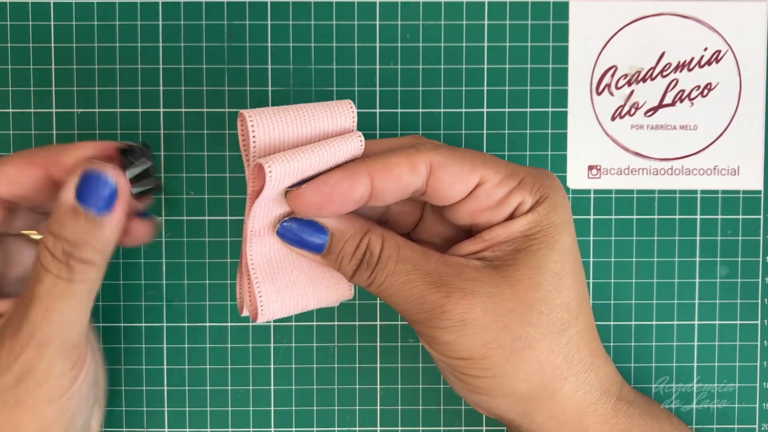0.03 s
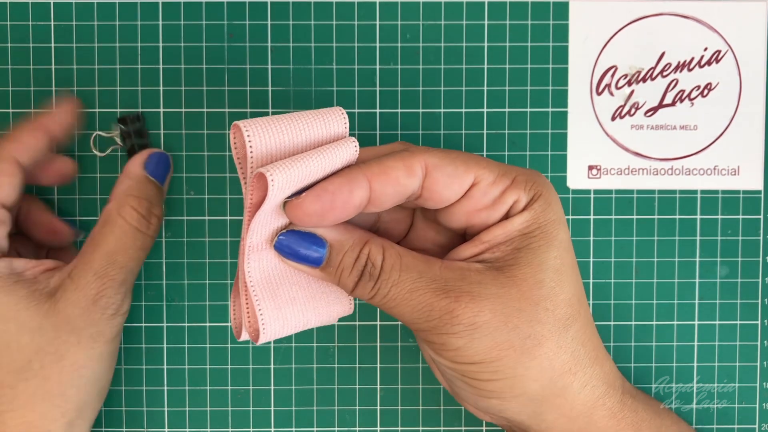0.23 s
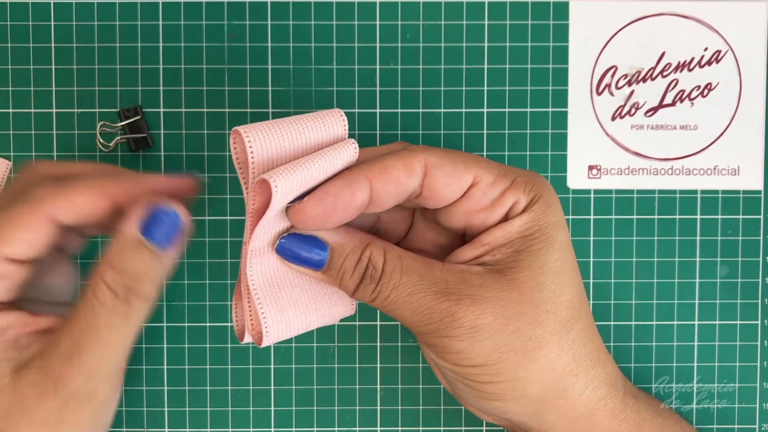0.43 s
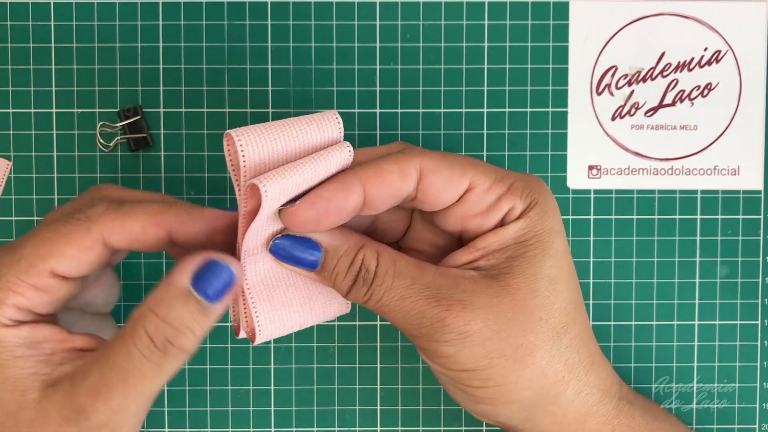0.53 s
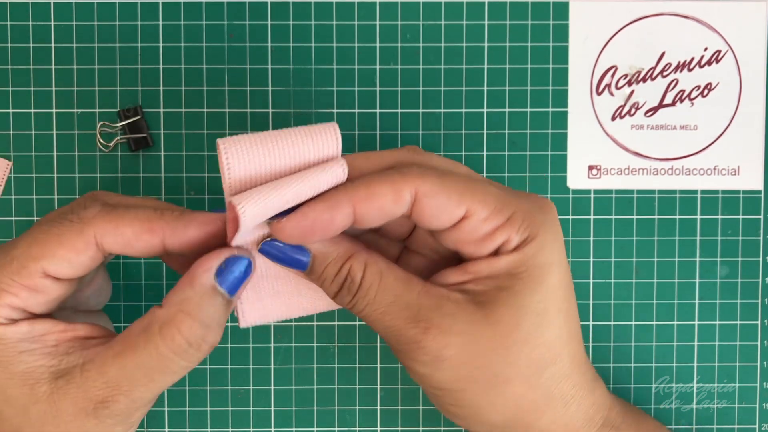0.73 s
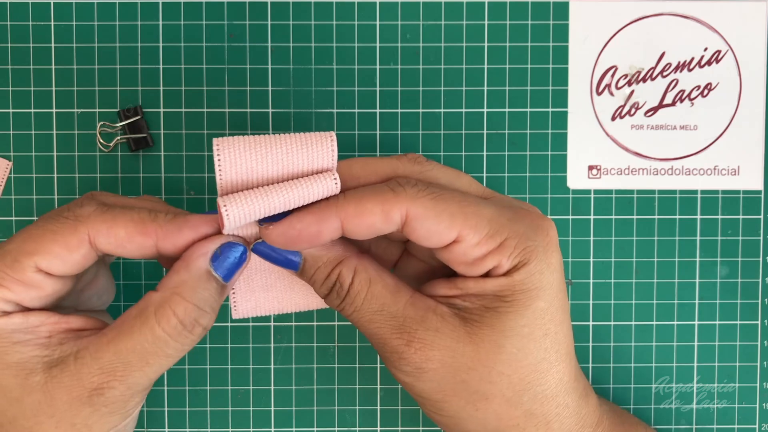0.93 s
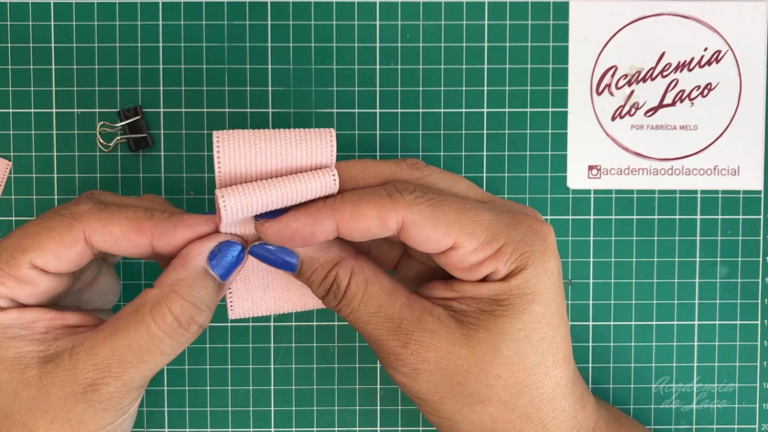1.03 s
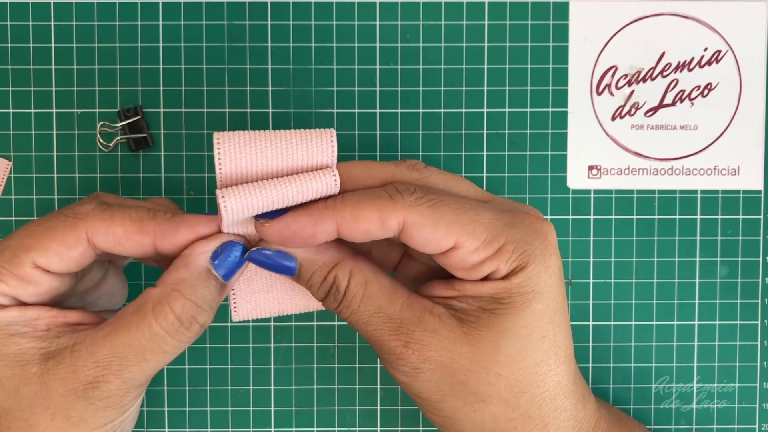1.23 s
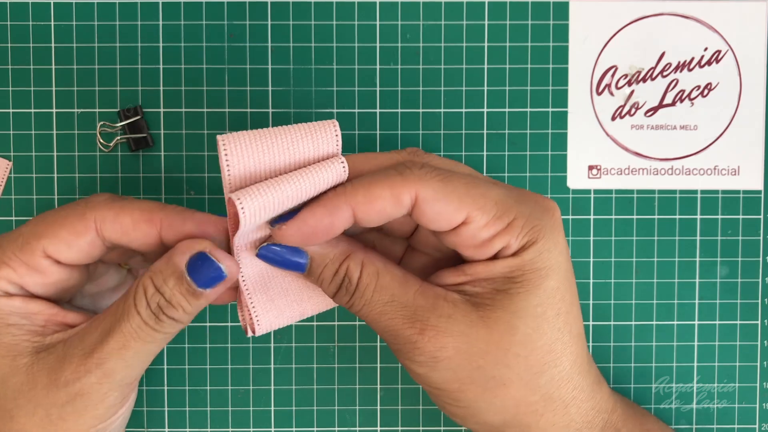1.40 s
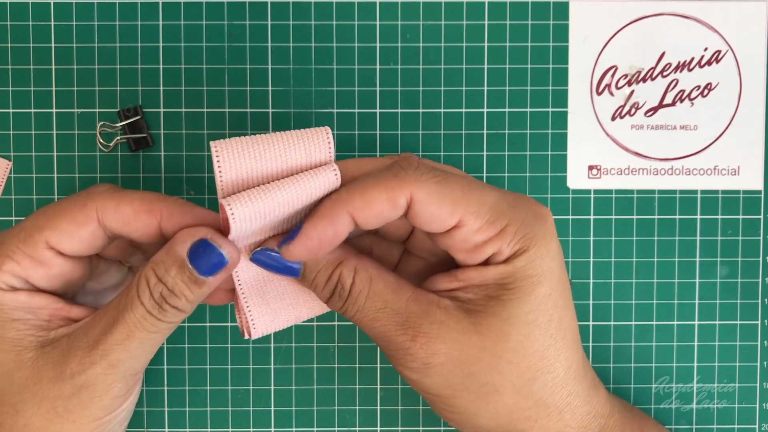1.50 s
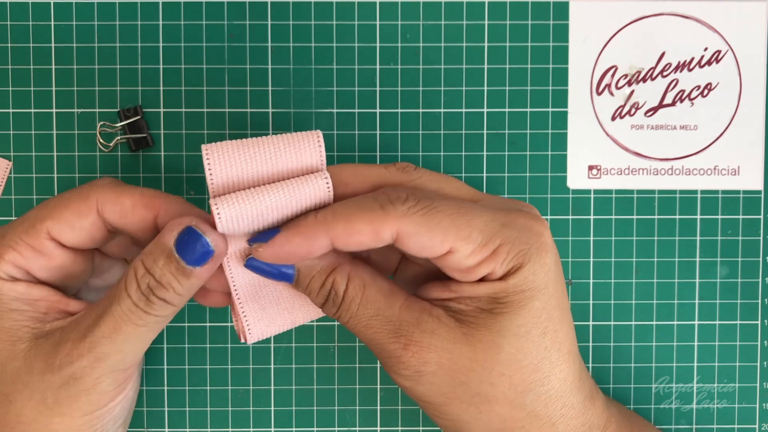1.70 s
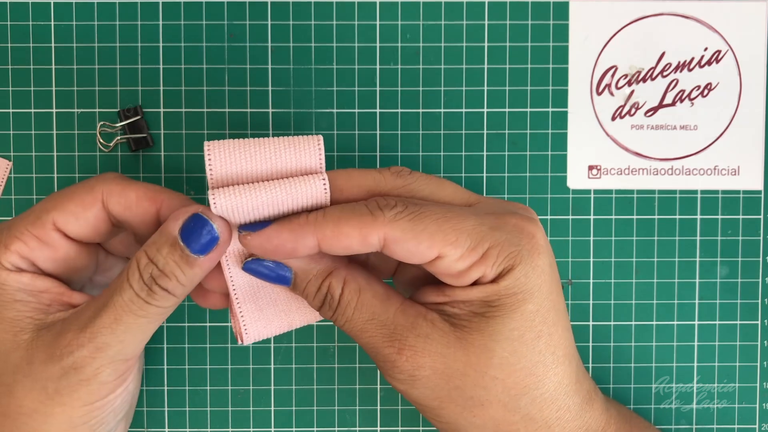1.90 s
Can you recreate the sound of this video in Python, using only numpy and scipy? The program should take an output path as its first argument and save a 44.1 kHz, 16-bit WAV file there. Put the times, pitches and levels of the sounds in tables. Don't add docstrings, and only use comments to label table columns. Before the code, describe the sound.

Binder clip set down at close range: tiny metallic ticks, a dull knock with quick bounces, a loud bright double snap and short chatter. Afterwards only soft ribbon folding and a small flick over a very faint hum in a quiet room.

```python
import sys
import numpy as np
from scipy import signal
from scipy.fft import rfft, irfft, next_fast_len
from scipy.io import wavfile
from scipy.ndimage import uniform_filter1d, map_coordinates

SR = 44100
rng = np.random.default_rng(int(sys.argv[2]) if len(sys.argv) > 2 else 0)


def volts_from_db(level):
    exponent = np.asarray(level, float) / 20
    return 10 ** exponent


def waveform_to_disk(signal):
    frames = np.transpose(np.atleast_2d(signal))
    scaled = np.clip(frames, -1, 1) * 32767
    samples = np.round(scaled).astype(np.int16)
    wavfile.write(sys.argv[1], SR, samples)


N = 85995


def unit(x):
    return x / np.sqrt(np.mean(x ** 2) + 1e-20)


def along(points, hz):
    f, v = np.transpose(points)
    return np.interp(np.log(hz + 1), np.log(f + 1), v)


def wobble(rate_hz):
    knots = rng.standard_normal(int(N * 40 / SR) + 4)
    return map_coordinates(knots, [np.arange(N) * rate_hz / SR])


def filtered(x, response):
    m = next_fast_len(len(x) + 8192)
    return irfft(rfft(x, m) * response(np.fft.rfftfreq(m, 1 / SR)), m)[:len(x)]


def noise(spectrum, size=N):
    return unit(filtered(rng.standard_normal(size), lambda hz: volts_from_db(along(spectrum, hz))))


def patchy(x):
    patch_db = 1
    z = signal.stft(x, nperseg=512)[2]
    field = uniform_filter1d(rng.standard_normal(z.shape), size=4, axis=0)
    field = uniform_filter1d(field, size=16, axis=1)
    return unit(signal.istft(z * volts_from_db(patch_db * unit(field)), nperseg=512)[1][:N])


# t/s, level/dB
HUM_SWELL = [(0.0, -46), (0.02, -52.5), (0.184, -57), (0.254, -43.5), (0.438, -48), (0.554, -58),
             (0.618, -48.5), (0.678, -41), (0.874, -58), (1.222, -46.5), (1.27, -61), (1.362, -54.5),
             (1.438, -61.5), (1.482, -50.5), (1.656, -49.5), (1.814, -63.5), (1.884, -53), (1.95, -54)]


def hum():
    tone_hz, wander_hz, flutter_db = 122.4, 1.5, 2.5
    s, db = np.transpose(HUM_SWELL)
    phase = 2 * np.pi * np.cumsum(tone_hz + wander_hz * wobble(20)) / SR
    level_db = np.interp(np.arange(N) / SR, s, db) + flutter_db * wobble(23)
    return np.sqrt(2) * volts_from_db(level_db) * np.sin(phase)


# f/Hz, density/dB per Hz
AIR_SPECTRUM = [(82, -32), (140, -4), (317, -21.5), (482, -18), (589, -23), (763, -17.5), (827, -23),
                (15200, -49), (16500, -60)]
# f/Hz, width/Hz, level/dB
DUCT_MODES = [(201, 13, -67), (258, 18, -63.5), (588, 50, -66)]
# f/Hz, level/dB
RUMBLE_SPECTRUM = [(20, -11), (45, 8), (100, 2), (140, 1)]


def air():
    out = volts_from_db(-57.5 + 1.0 * wobble(5.6)) * patchy(noise(AIR_SPECTRUM))
    for centre_hz, width_hz, db in DUCT_MODES:
        def resonance(f):
            damping = 1j * f * width_hz
            return damping / (centre_hz ** 2 - f ** 2 + damping)
        out += volts_from_db(db + 2.5 * wobble(14)) * unit(filtered(rng.standard_normal(N), resonance))
    return out + volts_from_db(-61 + 1.5 * wobble(3)) * noise(RUMBLE_SPECTRUM + [(200, -56)])


def ring(modes, t, tilt_db=0):
    rise_s, scatter_db, buzz_depth, buzz_grows_s = .00025, 1.5, .7, .008
    hz, db, t60 = np.transpose(modes)[:, :, None]
    db = db + scatter_db * rng.standard_normal(hz.shape)
    db = db + tilt_db * np.log2(hz / hz.max())
    flutter = unit(uniform_filter1d(rng.standard_normal((len(hz), len(t))), size=180, axis=1))
    buzz = 1 + buzz_depth * (1 - np.exp(-t / buzz_grows_s)) * flutter
    sign = (-1) ** np.arange(len(hz))[:, None]
    partials = sign * buzz * volts_from_db(db - 60 * t / t60) * np.sin(2 * np.pi * hz * t)
    return partials.sum(0) * (1 - np.exp(-t / rise_s))


# f/Hz, level/dB
CRACK_SPECTRUM = [(300, -37), (1500, -21), (3000, -6.5), (6000, -2), (9000, 0), (13000, 2), (16000, -2)]


def strikes(rows, voice):
    lead_samples = 8
    crack_t60_s, wake_crack_db, sizzle_t60_s, sizzle_db = .012, -10, .07, -24
    out, t = np.zeros(N + SR), np.arange(SR // 4) / SR
    impulse = -1.0 * (np.arange(len(t)) == lead_samples)
    spike = filtered(impulse, lambda hz: volts_from_db(along(CRACK_SPECTRUM, hz)))
    spike = spike / np.abs(spike).max()
    decay = volts_from_db(wake_crack_db - 60 * t / crack_t60_s) + volts_from_db(sizzle_db - 60 * t / sizzle_t60_s)
    for s, crack_db, *rest in rows:
        wake = decay * noise(CRACK_SPECTRUM, size=len(t))
        out[round(s * SR):][:len(t)] += volts_from_db(crack_db) * (spike + wake) + voice(t, *rest)
    return out[:N]


def free_ring(modes):
    return lambda t, ring_db, tilt_db=0: volts_from_db(ring_db) * ring(modes, t, tilt_db)


# t/s, crack/dB, ring/dB, tilt/dB per octave
TICK_EVENTS = [
    (.0663, -37, -66, 0),
    (.0892, -34, -22, 4),
    (.1020, -39, -47, -11),
]
# f/Hz, level/dB, t60/s
WIRE_MODES = [(4097, -26, .05), (5300, -30, .01), (8511, -9, .018), (10020, -22, .01), (11100, -16, .01),
              (13520, -24, .02), (14930, -14, .04), (15600, 0, .012)]


def wire_ticks():
    return strikes(TICK_EVENTS, free_ring(WIRE_MODES))


# t/s, length/s, level/dB
RUB_EVENTS = [
    (.207, 0.12, -59),
    (0.527, 0.061, -60),
    (.79, .04, -100),
    (1.074, 0.041, -58.5),
    (1.359, 0.04, -66),
    (1.69, .04, -67.5),
    (1.48, 0.031, -75),
]
# f/Hz, level/dB
RUB_SPECTRUM = [(500, -16), (1800, 0), (6000, -2), (16000, -1)]


def ribbon():
    t = np.arange(N) / SR
    shape = sum(volts_from_db(db) * (t > s) * np.exp(-np.abs(t - s) / length_s) for s, length_s, db in RUB_EVENTS)
    return shape * volts_from_db(1.6 * wobble(40)) * noise(RUB_SPECTRUM)


# f/Hz, level/dB, t60/s
MAT_MODES = [(190, -9, .11), (290, -11, .09), (520, -11, .05), (700, -7, .035), (990, -12, .03),
             (1300, -4, .018), (1600, -2, .02), (2040, -1, .02), (2990, -2, .012), (4460, -2, .01)]
# f/Hz, level/dB
THUD_SPECTRUM = [(90, -39), (170, -1), (400, -5.5), (700, -1.5), (2000, -9), (4000, -12.5), (16000, -38)]


def mat_knock(t):
    thud_db, thud_t60_s, thud_rise_s = -9, 0.08, .002
    envelope = volts_from_db(thud_db - 60 * t / thud_t60_s) * (1 - np.exp(-t / thud_rise_s))
    return ring(MAT_MODES, t) + envelope * noise(THUD_SPECTRUM, size=len(t))


def on_mat(modes):
    return lambda t, ring_db, knock_db: volts_from_db(ring_db) * ring(modes, t) + volts_from_db(knock_db) * mat_knock(t)


# t/s, crack/dB, ring/dB, knock/dB
LANDING_EVENTS = [
    (.2481, -18.5, -43.5, -15),
    (.2622, -36, -28.5, -30.5),
    (.2772, -30.5, -29, -23),
    (.2895, -36.5, -34, -28),
    (.3065, -49, -46, -35.5),
]
# f/Hz, level/dB, t60/s
BODY_MODES = [(1960, 1, 0.017), (2595, -5.5, .05), (2870, -3.5, 0.086), (4107, -2, 0.057), (4596, 5, 0.038),
              (8100, -6.5, 0.11), (8700, -6.5, .04), (9000, -13, .04), (10580, -11, 0.025),
              (11920, -11.5, .05)]


def landing():
    return strikes(LANDING_EVENTS, on_mat(BODY_MODES))


# t/s, crack/dB, ring/dB
JAW_EVENTS = [
    (.2785, -57.5, -33),
    (.3050, -66.5, -41),
    (.3290, -62.5, -25.5),
]
# f/Hz, level/dB, t60/s
FREE_JAW_MODES = [(6120, 0, .13), (10600, -14, .08), (12460, -9, .06)]


def jaw():
    return strikes(JAW_EVENTS, free_ring(FREE_JAW_MODES))


# t/s, crack/dB, ring/dB, knock/dB
SNAP_EVENTS = [
    (.3262, -29, -40, -48.5),
    (.3288, 0, -32.5, -25.5),
    (.3763, -7, -23, -39),
    (.3790, -11, -24.5, -44.5),
    (.3957, -15.5, -32.5, -79.5),
    (.4008, -22, -41, -52),
    (.4058, -22.5, -31.5, -41.5),
    (.4112, -23, -66.5, -40),
]
# f/Hz, level/dB, t60/s
STEEL_MODES = [(2040, -15, .06), (2990, -18, .06), (4465, -14, .05), (6120, -1, .065), (7600, -5, .07),
               (7660, -3, .08), (8070, -5, .06), (9625, -8, .06), (10620, -9, .06), (12200, -3, .075),
               (12480, -5, .065), (12990, -11, .05), (15010, -10, .05), (15530, -11, .05)]


def handle_snaps():
    return strikes(SNAP_EVENTS, on_mat(STEEL_MODES))


# t/s, crack/dB, ring/dB
FLICK_EVENTS = [
    (.795, -62, -76),
    (.949, -66, -64),
    (1.0657, -33, -43),
    (1.369, -57, -72),
]
# f/Hz, level/dB, t60/s
NAIL_MODES = [(1470, -7.5, 0.033), (3060, -2.5, 0.018), (4450, 6, 0.01), (5780, -3, 0.03),
              (9050, -16, .012), (13000, -3, .015), (14700, -1, .02)]


def nail_flicks():
    return strikes(FLICK_EVENTS, free_ring(NAIL_MODES))


# f/Hz, t60/s
ROOM_DECAY = [(300, 0.75), (2000, 0.55), (6000, 0.27), (14000, 0.12)]


def room(x):
    hz, t, z = signal.stft(rng.standard_normal(SR // 2), SR, nperseg=256)
    decay = volts_from_db(-60 * t / along(ROOM_DECAY, hz)[:, None])
    tail = signal.istft(z * decay, SR, nperseg=256)[1]
    delayed = np.pad(x, (200, 0))
    return signal.fftconvolve(delayed, tail / np.linalg.norm(tail))[:N]


def scene():
    quiet_top_hz, room_db = 15800, -16
    background = hum() + air()
    clip = wire_ticks() + landing() + jaw() + handle_snaps() + nail_flicks()
    rub = ribbon()
    quiet = rub + volts_from_db(room_db) * room(clip + rub) + background
    return (clip + filtered(quiet, lambda hz: 1 / (1 + (hz / quiet_top_hz) ** 80)))[None]


# t/s, depth/dB, from f/Hz
THIN_EVENTS = [
    (.272, -10, 4800),
    (.3135, -11, 3000),
    (.532, -18, 900),
    (.682, -18, 1500),
    (1.043, -24, 2200),
    (1.19, -14, 1500),
    (1.277, -16, 1200),
]


def thin_treble(x):
    half_s, kept_share, kept_db, favoured_hz = .007, .04, 5, 6000
    out, t = x.copy(), np.arange(N) / SR
    for s, depth_db, from_hz in THIN_EVENTS:
        at = np.flatnonzero(np.abs(t - s) < 2 * half_s)
        part = x[at] * np.clip(2 - np.abs(t[at] - s) / half_s, 0, 1)
        z, hz = rfft(part), np.fft.rfftfreq(len(at), 1 / SR)
        treble = hz > from_hz
        weight = np.abs(z) * hz / (hz + favoured_hz) ** 1.5
        weak = treble & (weight < np.quantile(weight[treble], 1 - kept_share))
        change = volts_from_db(np.where(weak, depth_db, kept_db)) - 1
        out[at] += irfft(z * treble * change, len(at))
    return out


def band_limit(x):
    return signal.sosfilt(signal.butter(12, 17330, fs=SR, output="sos"), x)


def record(dry):
    headroom, knee, top_hz = .9, 6, 16400
    soft = dry[0] / (1 + np.abs(dry[0] / headroom) ** knee) ** (1 / knee)
    limited = filtered(soft, lambda hz: 1 / (1 + (hz / top_hz) ** 60))
    mix = thin_treble(limited)[None]
    return band_limit(mix)


dry = scene()
out = record(dry)
waveform_to_disk(out)
```